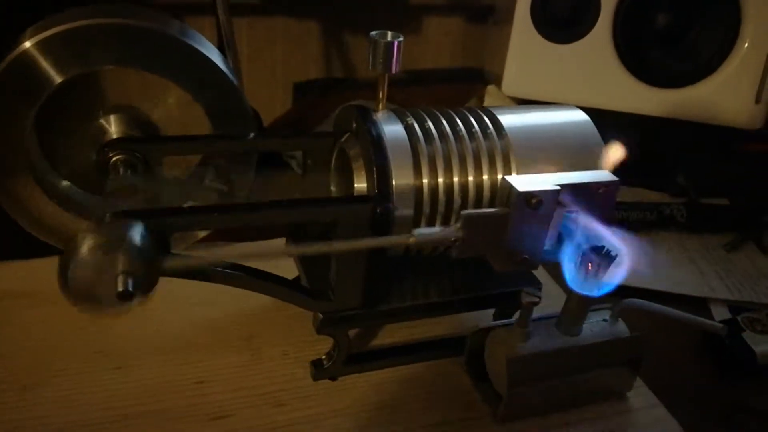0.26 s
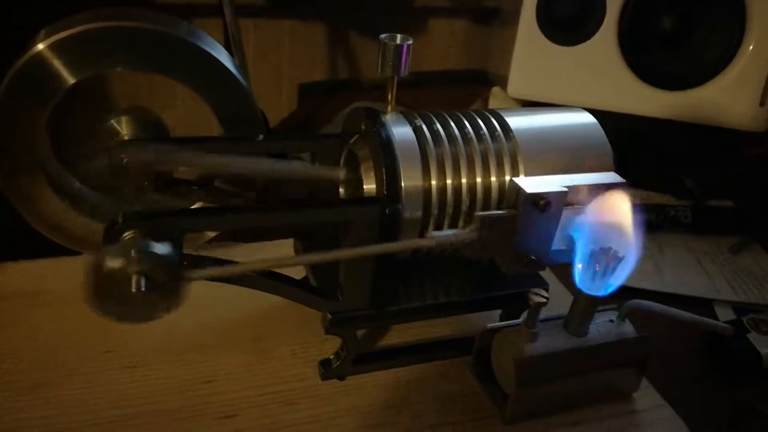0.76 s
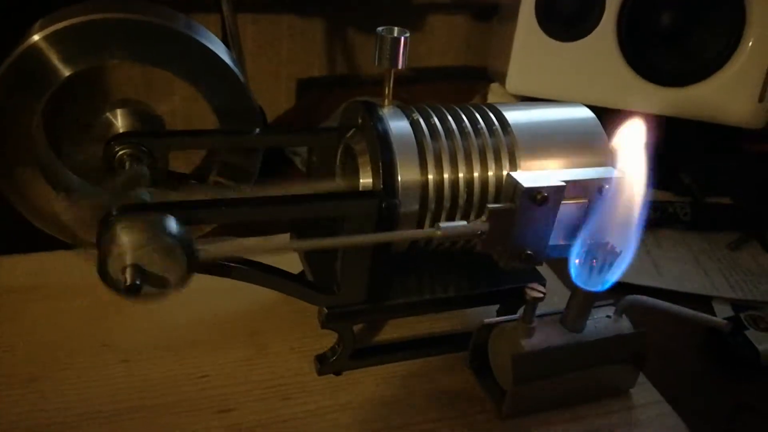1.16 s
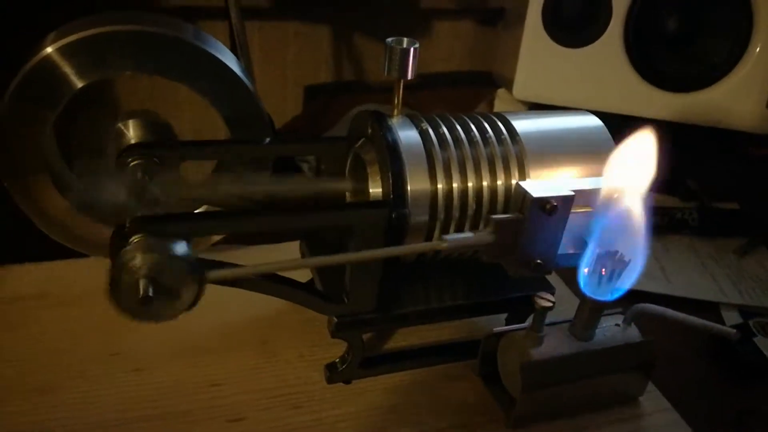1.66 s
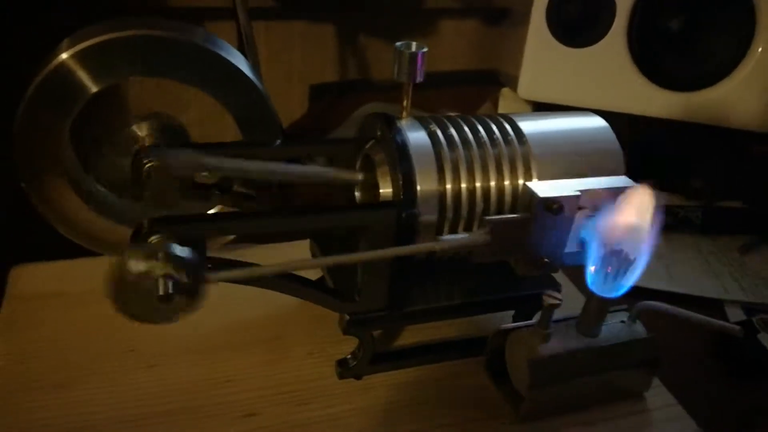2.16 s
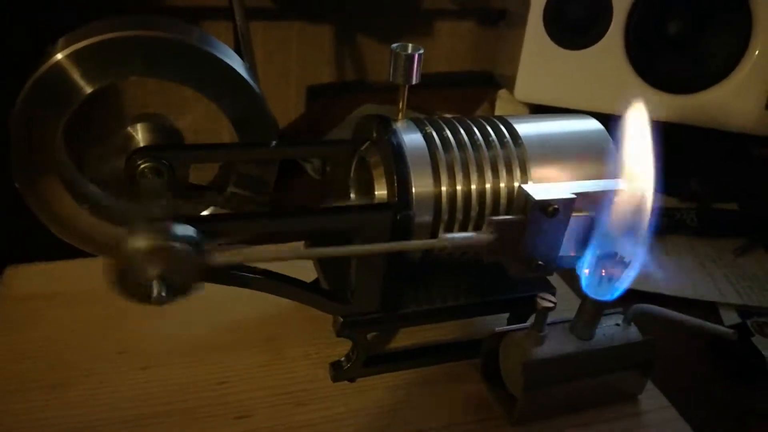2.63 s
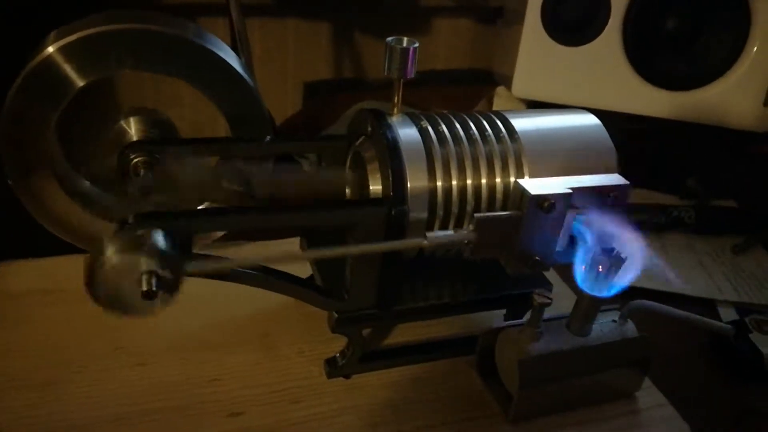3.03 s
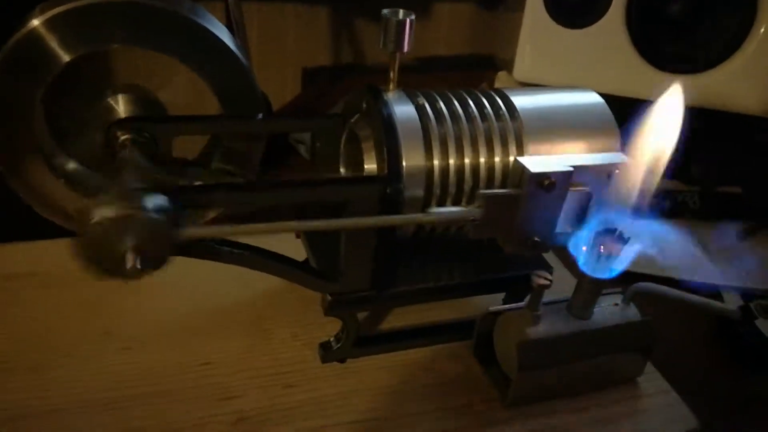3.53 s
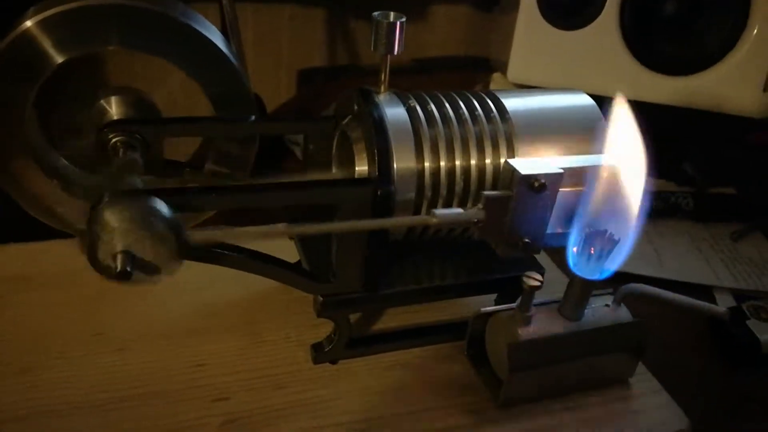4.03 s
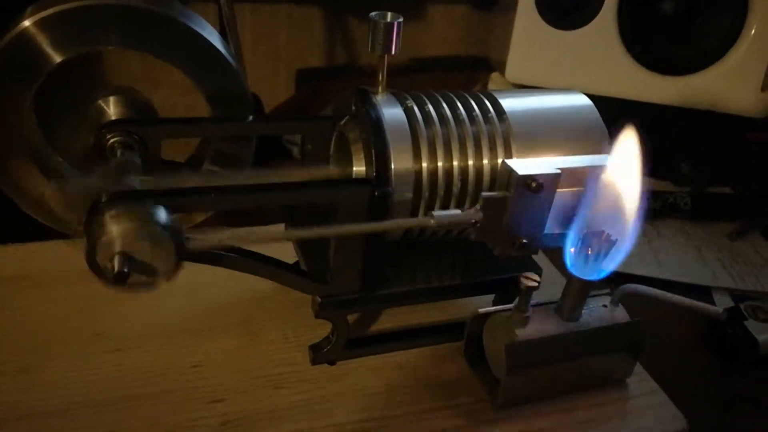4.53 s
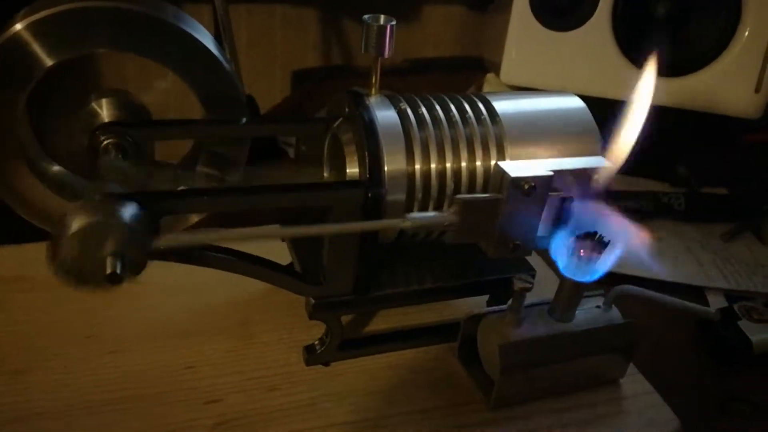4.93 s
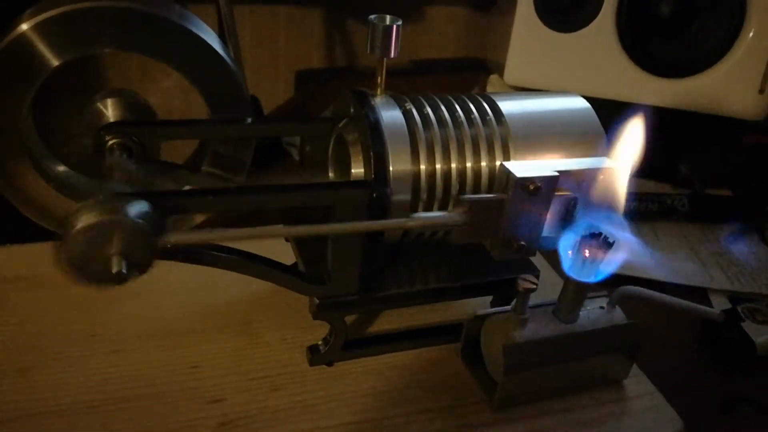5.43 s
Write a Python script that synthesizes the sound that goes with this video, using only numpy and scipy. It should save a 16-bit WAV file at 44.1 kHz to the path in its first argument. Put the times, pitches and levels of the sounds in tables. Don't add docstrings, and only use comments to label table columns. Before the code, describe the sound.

A small flame-driven engine is already running on a wooden desk and keeps going throughout, just under six turns per second, with slight unevenness in timing and strength. Every turn begins with a sharp, bright spurt of escaping gas, followed within a few milliseconds by a metal slap and a short low thump through the desk. Then come a ringing click as the plate reseats, smaller cam and crank knocks, a very brief breathy falling whistle, a soft puff, and a latch tick just before the next pop. Flame flutter, faint hiss and occasional tiny crackles lie beneath. The pace is quickest at first, easing slightly from about 1.2 s, then picking up a little after 4 s. From 0 to 4 s the engine is at arm's length; around 4.3 s the handheld microphone moves in and everything becomes louder and crisper, drawing back slightly by 5.6 s. Small quiet room, short reverberation, engine on the right.

```python
import sys
import numpy as np
from scipy import signal
from scipy.fft import rfft, irfft, next_fast_len
from scipy.io import wavfile
from scipy.ndimage import uniform_filter1d

SR = 44100
rng = np.random.default_rng(int(sys.argv[2]) if len(sys.argv) > 2 else 0)


def put_to_file(sound):
    columns = np.atleast_2d(sound).T
    safe = np.clip(columns, -1, 1)
    whole_steps = np.round(safe * 32767)
    wavfile.write(sys.argv[1], SR, whole_steps.astype(np.int16))


def volts(x):
    e = np.asarray(x, float) / 20
    return 10 ** e


N = 250929

# (time [s], gas level [dB], low desk mode [dB], upper desk mode [dB])
FAR_POPS = [(0.099, -28, -41.2, -40.5), (0.262, -26, -36.5, -44), (0.4234, -26, -38, -38.5),
            (0.5859, -27.5, -37, -39), (0.749, -25, -33.5, -38.5), (0.9146, -24.5, -36, -39),
            (1.08, -25, -33, -49), (1.2535, -26, -32.5, -44.5), (1.4263, -25.5, -38.5, -39.5),
            (1.607, -27.5, -33.5, -43), (1.7866, -25, -36, -55), (1.966, -25, -38, -46),
            (2.145, -26, -43, -44.5), (2.3242, -27.5, -40.5, -39), (2.5032, -28.5, -41.5, -38),
            (2.68, -25, -39.5, -37.5), (2.8551, -24.5, -34.5, -46), (3.031, -25, -36.5, -42),
            (3.2039, -24.5, -39, -37.5), (3.381, -23.5, -37.5, -38), (3.5612, -27, -36, -42),
            (3.7345, -25, -34, -39), (3.9107, -29.5, -38, -39), (4.0888, -26, -37.5, -38.5)]
# (time [s], gas level [dB], low desk mode [dB], upper desk mode [dB])
NEAR_POPS = [
    (4.2613, -24.5, -37, -36.5),
    (4.432, -21.5, -39.5, -34.5),
    (4.6028, -22.5, -34.5, -34.5),
    (4.771, -22.5, -36.5, -36),
    (4.9382, -21.5, -32.5, -33.5),
    (5.1065, -22.5, -39, -34),
    (5.2724, -20.5, -33.5, -36.5),
    (5.4416, -27, -36, -39.5),
    (5.6097, -25.5, -39, -36),
]
# (time [s], gain [dB])
MIC_DRIFT = [
    (0.0, 1.5),
    (0.95, 1),
    (1.2, 0.2),
    (2.6, -0.2),
    (4.1, 0.4),
    (4.4, 5),
    (5.25, 4.5),
    (5.65, 2.5),
]
# (frequency [Hz], level [dB])
GAS_HISS = [(1000, -2.5), (3000, -13), (6200, -3.5), (7200, -10.5), (9500, -10.5), (11000, -24),
            (14000, -10.5), (16500, -33)]
# (frequency [Hz], level [dB])
DULL_METAL = [(300, -2.5), (800, -2), (1600, -5), (2600, -50), (4000, -40), (6200, -5.5), (9000, -73),
              (16000, -62)]
# (frequency [Hz], width [Hz])
DESK_MODES = [(118, 86), (252, 79)]
# (frequency [Hz], width [Hz], level [dB])
BASE_MODES = [(120.6, 9.8, -6), (254.3, 6.7, -1.5), (432.6, 17, 4.5), (740, 17, 17), (211, 17.4, -2.5)]


def shape(x, points):
    size = next_fast_len(N + SR)
    hz, db = np.transpose(points)
    f = np.maximum(np.arange(size // 2 + 1) * SR / size, 1)
    gain = volts(np.interp(np.log(f), np.log(hz), db))
    return irfft(rfft(x, size) * gain, size)[..., :N]


def ring(x, hz, width_hz):
    return signal.lfilter(*signal.iirpeak(hz, hz / width_hz, fs=SR), x)


def body(x, colour, modes):
    return shape(x, colour) + sum(volts(db) * ring(x, hz, width) for hz, width, db in modes)


def place(times, db, form):
    at = (np.asarray(times) * SR).astype(int)
    keep = (at >= 0) & (at < N)
    marks = np.bincount(at[keep], volts(np.asarray(db))[keep], N)
    return signal.fftconvolve(marks, form)[:N]


def burst(times, db, rise_ms, fall_ms, grain_db):
    ms = np.arange(SR // 20) * 1000 / SR
    form = (1 - np.exp(-(ms / rise_ms) ** 2)) * np.exp(-ms / fall_ms)
    grain = volts(grain_db * np.repeat(rng.standard_normal(N // 8 + 1), 8)[:N])
    return place(times, db, form / form.max()) * grain * rng.standard_normal(N)


def thump(times, db, suck_ms, suck, push_ms):
    ms = np.arange(SR // 20) * 1000 / SR
    push = np.exp(-((ms - suck_ms) / push_ms) ** 2)
    return place(times, db, push - suck * np.sin(np.pi * np.clip(ms / suck_ms, 0, 1)))


def knock(times, db, modes, contact_ms):
    blow = thump(times, db, 0.51, 0.47, contact_ms) + 0.64 * burst(times, db, 0.68, 1.2, 4.5)
    return sum(volts(gain_db) * ring(blow, hz, width) for hz, width, gain_db in modes)


def each_turn(share, db, scatter_db):
    pops = np.transpose(FAR_POPS + NEAR_POPS)[0]
    pops = np.concatenate([[2 * pops[0] - pops[1]], pops, [2 * pops[-1] - pops[-2]]])
    s = pops[:-1] + share * np.diff(pops)
    near_db = np.interp(s, *np.transpose(MIC_DRIFT))
    return s, db + near_db + scatter_db * rng.standard_normal(len(s))


def quiet():
    # (frequency [Hz], level [dB])
    hush = [(18, -37), (30, 10), (278, -5), (555, -13), (1140, -12.5), (2800, -21.5), (5290, -21.5),
            (6370, -30), (17000, -43)]
    mid, side = rng.standard_normal((2, N))
    side = shape(side, [(120, -55), (300, -9), (600, 2)])
    hum = sum(1.66 * ring(mid, hz, width) for hz, width, db in BASE_MODES[:2])
    gusts = np.repeat(rng.standard_normal(N // 700 + 1), 700)[:N]
    flutter = volts(2.9 * uniform_filter1d(gusts, size=1400))
    return volts(-49.5) * flutter * (shape(np.array([mid + side, mid - side]), hush) + hum)


def room(x):
    # (band centre [Hz], decay by 60 dB [s], level [dB])
    bands = [(249, 0.24, -12), (704, 0.19, -27), (1830, 0.28, -24.5), (3600, 0.25, -27.5),
             (8000, 0.29, -32), (13000, 0.57, -55)]
    t = np.arange(SR // 2) / SR
    onset = np.clip(t / 0.0015 - .3, 0, 1)
    tail = 0
    for hz, t60, db in bands:
        mid, side = ring(rng.standard_normal((2, len(t))), hz, 0.66 * hz)
        pair = mid + min(hz / 700, 1) * side * np.array([[1], [-1]])
        tail = tail + volts(db - 60 * t / t60) * onset * pair / np.sqrt(SR / 100)
    wet = signal.fftconvolve(x[None], tail, axes=1)[:, :N]
    return shape(wet, [(14500, 2.0), (15850, 0), (16100, -25)])


def far_port(x):
    # (frequency [Hz], level [dB])
    shadow = [(300, 1), (680, -3.5), (1200, -2.5), (2300, -2), (4500, -11.5), (7800, -21), (9800, -12),
              (13000, -14), (16000, -11)]
    # (frequency [Hz], lag [samples])
    lag = [(300, 1), (800, 0), (1300, 6), (2300, 8), (4000, 10)]
    strength = .58
    size = next_fast_len(N + SR)
    f = np.arange(size // 2 + 1) * SR / size
    phase = -2 * np.pi * f / SR * np.interp(f, *np.transpose(lag))
    for delay in rng.integers([23, 70], [60, 120]):
        echo = np.exp(-2j * np.pi * f * delay / SR)
        loop = np.unwrap(np.angle((strength + echo) / (1 + strength * echo)))
        phase += loop * np.clip(f / 270 - 1, 0, 1)
    return shape(irfft(rfft(x, size) * np.exp(1j * phase), size)[:N], shadow)


def wick():
    # (time [s], level [dB])
    crackles = [(0.5008, -48), (2.1901, -51), (3.3411, -59), (3.454, -63), (3.6291, -51), (3.8203, -53),
                (4.574, -46), (5.2443, -68), (5.3289, -59), (5.5813, -71), (5.6845, -48)]
    s, db = np.transpose(crackles)
    return shape(burst(s, db + 5, .3, 0.47, 2.5), [(2500, -1), (6000, -1), (16000, -10)])


def whistle():
    s, db = (column[:, None] for column in each_turn(.508, -52.5, 2.2))
    hz = 1146.6 * (1 + 0.0713 * rng.standard_normal(s.shape))
    ms = np.arange(-SR // 70, SR // 70) * 1000 / SR
    phase = 2 * np.pi * np.cumsum(hz * np.exp(-.024 * ms), axis=1) / SR
    gusts = uniform_filter1d(rng.standard_normal((len(s), 2, len(ms))), size=50) * np.sqrt(50)
    tone = (0.22 + gusts[:, 0]) * np.sin(phase) + gusts[:, 1] * np.cos(phase)
    blown = volts(db - 1.5) * np.exp(-(ms / 6.0) ** 4) * tone
    at = np.clip(((s + ms / 1000) * SR).astype(int), 0, N - 1)
    return np.bincount(at.ravel(), blown.ravel(), N)


def closing_puff():
    # (frequency [Hz], width [Hz], level [dB])
    port = [(5430, 1300, -5), (12200, 900, -21)]
    s, db = each_turn(.555, -59, 3.2)
    puff = body(burst(s - .003, db + 7.0, 6.5, 3.0, 3.25), GAS_HISS, port)
    push = thump(s - .003, db + 4.0, 9.2, 1.0, 0.65)
    scuff = shape(burst(s + 0.012, db - 11, 14.0, 7.5, 10.0), DULL_METAL)
    return puff + scuff, push


def cam_follower():
    # (frequency [Hz], width [Hz], level [dB])
    follower = [(1880, 190, 7.5), (3130, 160, 3.5), (3800, 200, 2.5), (4240, 250, 1), (4840, 650, -0.5),
                (6100, 330, -7), (7600, 310, 0)]
    s, db = each_turn(.335, -49, 2.8)
    return body(burst(s - .0004, db + 6.5, 0.78, 3.0, 2.0), DULL_METAL, follower)


def crank_pin():
    # (frequency [Hz], width [Hz], level [dB])
    pin = [(3400, 94, 15.3), (4900, 220, 12), (4900, 186, 0.88)]
    # (frequency [Hz], width [Hz], level [dB])
    linkage = [(775, 78, 7.8), (1610, 280, 4.3)]
    share = .448
    s, click_db = each_turn(share, -52.5, 2.4)
    knock_db = each_turn(share, -47, 1.1)[1]
    early_db = each_turn(share, -52.5, 1.18)[1]
    click = body(burst(s - .0003, click_db, 0.29, 2.1, 5.7), GAS_HISS, pin)
    knocks = burst(s - .0003, knock_db + 6, 0.55, 1.55, 3.7)
    knocks += burst(s - .0055, early_db + 11.0, 0.95, 4.6, 0.87)
    return click + body(knocks, DULL_METAL, linkage)


def latch():
    # (frequency [Hz], width [Hz], level [dB])
    lever = [(420, 40, 12.5), (1090, 270, 6.5), (1510, 143, 8), (3940, 120, 2), (7800, 300, 1.5)]
    s, db = each_turn(.872, -48, 1.56)
    tick = shape(burst(s - .0004, db + 5.0, 0.36, 2.6, 1.0), GAS_HISS)
    fall = knock(s + 0.00213, db + 6.5, lever, 0.13)
    rattle = body(burst(s + 0.0012, db + 2.5, 0.66, 1.5, 3.4), DULL_METAL, lever)
    shiver = ring(burst(s + 0.0025, db - 11.5, 16.0, 16.0, 12.0), 750, 590)
    return tick + fall + rattle + shiver


def reseating_plate():
    # (frequency [Hz], level [dB])
    sharp = [(300, 7.5), (900, -2), (3000, -15.5), (5000, -2), (7000, -18), (11000, -8), (14000, 2.5),
             (16500, -7)]
    # (frequency [Hz], width [Hz], level [dB])
    plate = [(4220, 93, 13.6), (5700, 1600, 1.4), (8250, 300, 8.7), (9500, 490, 1)]
    # (frequency [Hz], width [Hz], level [dB])
    seat = [(1770, 180, -7.5), (1824, 180, 2)]
    share = .182
    s, db = each_turn(share, -39.5, 2.4)
    knock_db = each_turn(share, -42.5, 0.57)[1]
    click = body(burst(s - .0004, db - 0.5, 0.62, 3.0, 2.3), sharp, plate)
    push = thump(s - .008, db - 19.5, 6.5, 0.079, 0.18)
    return click + knock(s, knock_db + 21.0, seat, 0.067), push


def contacts():
    plate, plate_push = reseating_plate()
    puff, puff_push = closing_puff()
    push = plate_push + puff_push
    desk = 0.94 * ring(push, *DESK_MODES[0]) + 0.27 * ring(push, *DESK_MODES[1])
    head = plate + puff + whistle() + push + desk
    return head, cam_follower() + crank_pin() + latch()


def desk_thump(s, low_db, upper_db):
    low = thump(s, low_db + 5.0, 7.424, 0.27, 0.88)
    lift = thump(s - .003, upper_db + 0.5, 2.82, 0.19, 0.6)
    upper = thump(s - .0008, upper_db + 7.5, 7.12, 0.29, 0.85) - 1.43 * lift
    base = sum(volts(db) * ring(low + upper, hz, width) for hz, width, db in BASE_MODES)
    desk = 0.45 * ring(low, *DESK_MODES[0]) + 1.74 * ring(upper, *DESK_MODES[1])
    return 1.05 * low - 0.53 * lift + desk + base


def plate_slap(s, slap_s):
    # (frequency [Hz], level [dB])
    slap_colour = [(250, -19), (550, 3.5), (800, 4), (1500, 3.5), (2600, -0.5), (4000, -5.5), (6000, -4),
                   (10000, -38)]
    # (frequency [Hz], width [Hz], level [dB])
    head_modes = [(422.6, 32, 1.5), (1090, 65, 4.5), (2151, 77, 6), (3143, 69, 6), (4910, 215, 1.5),
                  (5335, 344, 3.5)]
    db = each_turn(0, -38.5, 1)[1][1:]
    tap = burst(s - .0006, db + 10, 0.83, 7.2, 0.83)
    return body(tap + burst(slap_s, db + 9.0, 0.3, 4.77, 4.44), slap_colour, head_modes)


def gas_spurts(s, gas_db, slap_s):
    # (frequency [Hz], level [dB])
    gas_colour = [(1500, -10.5), (3000, -2), (5000, -5), (6800, -2), (8500, 3), (9800, 1), (10600, -5),
                  (13000, -0.5), (14800, 2), (15600, 6), (16100, 1), (17000, -26)]
    chance = rng.standard_normal((3, len(s)))
    first = burst(s - .0007, gas_db - 0.5 + 1.0 * chance[0], 1.29, 2.64, 4.2)
    second = burst(slap_s - .0003, gas_db - 1 + 0.5 * chance[1], 0.58, 1.89, 4.1)
    third = burst(slap_s + 0.00563, gas_db - 16.5 + 6.97 * chance[2], 0.28, 0.42, 4.7)
    later = shape(second + third, [(5000, 10.0), (9000, 1.5), (12000, -4.5)])
    trail = shape(burst(s, gas_db - 16.5, 0.95, 23.5, 5.0), GAS_HISS)
    trail = shape(trail, [(9000, -0.5), (13000, -9)])
    fins = volts(1) * ring(first, 9810, 44) + volts(-22) * ring(first, 8400, 45)
    return shape(first + later, gas_colour) + trail + fins


def valve():
    s, gas_db, low_db, upper_db = np.transpose(FAR_POPS + NEAR_POPS)
    delay_ms = 3.54 + 0.72 * rng.standard_normal(len(s))
    slap_s = s + delay_ms / 1000
    gas = gas_spurts(s, gas_db, slap_s)
    return gas, plate_slap(s, slap_s) + desk_thump(s, low_db, upper_db)


def scene():
    gas, *others = (*valve(), *contacts())
    parts = (gas + wick(), *others)
    engine = sum(parts)
    near_db = np.interp(np.arange(N) / SR, *np.transpose(MIC_DRIFT))
    wet = room(engine) + volts(0.95 * near_db - 1.5) * quiet()
    far = sum(far_port(x) for x in parts) + shape(wet[0], [(2500, -0.5), (8000, -6.5), (15000, 2.0)])
    return np.array([far, engine + wet[1]])


def band_limit(x):
    return signal.sosfilt(signal.butter(12, 17160, fs=SR, output="sos"), x)


def record(dry):
    ceiling = .36
    rounded = ceiling * np.tanh(dry / ceiling)
    low_cut = signal.butter(1, 40, "high", fs=SR, output="sos")
    heard = shape(signal.sosfilt(low_cut, rounded), [(15900, 0.5), (16050, -7), (17200, -28)])
    return band_limit(heard)


dry = scene()
out = record(dry)
put_to_file(out)
```